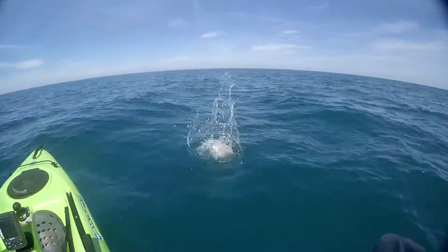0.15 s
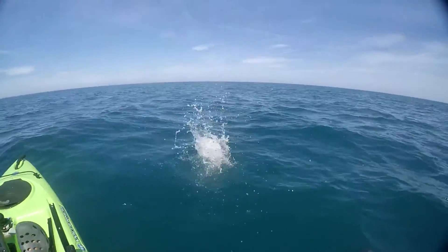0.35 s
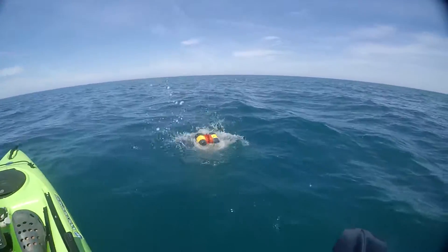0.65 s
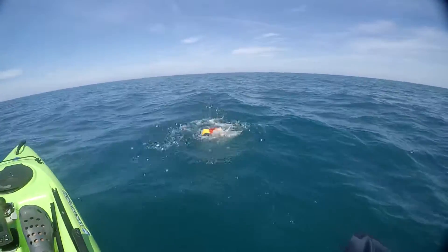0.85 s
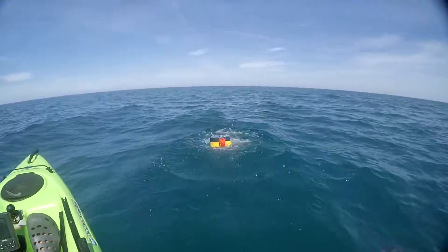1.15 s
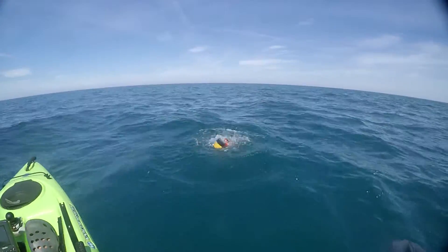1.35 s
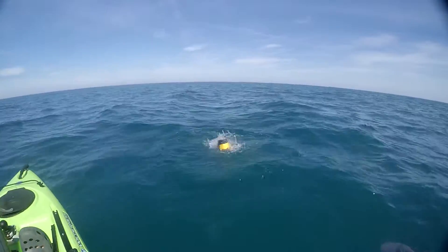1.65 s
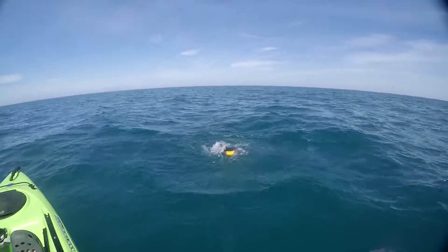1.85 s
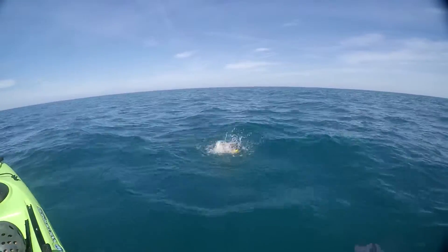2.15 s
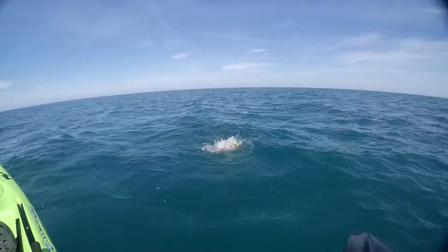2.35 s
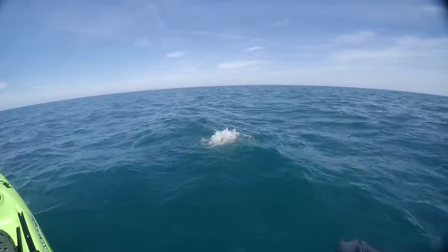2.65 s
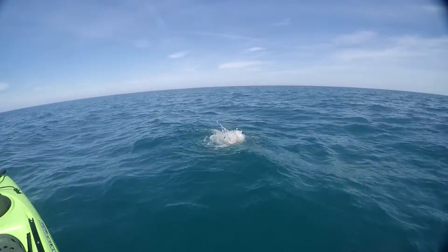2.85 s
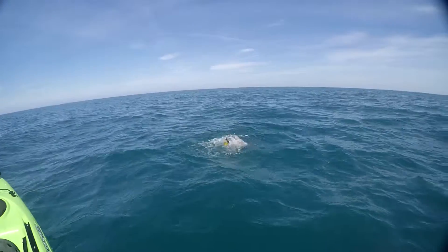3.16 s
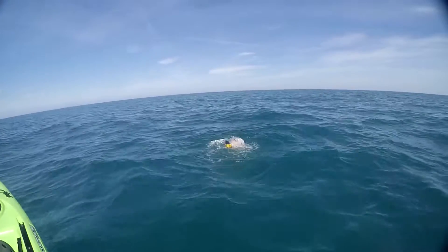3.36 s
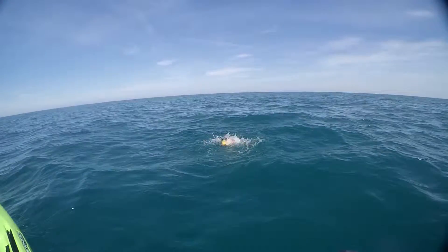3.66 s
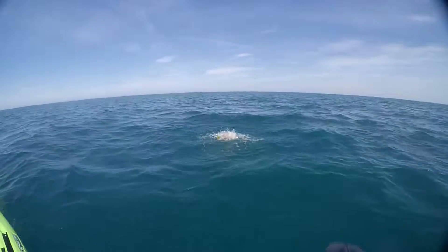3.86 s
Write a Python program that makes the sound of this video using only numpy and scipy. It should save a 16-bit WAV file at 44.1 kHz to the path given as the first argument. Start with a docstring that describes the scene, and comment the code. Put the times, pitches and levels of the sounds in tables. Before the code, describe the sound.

Something splashes into open water, followed by falling drops, soft gurgles and wind rumble.

```python
"""An object splashes into the sea a few metres from a kayak: a plume hisses, the cavity slaps shut,
the thrown water rains back and stray drops tick. Wavelets then lap, glug and fizz with ringing bubbles
and bump the hull. Wind sways and buffets the microphone, whose waterproof case gives the water
a hollow colour."""
import sys
import numpy as np
from scipy import signal
from scipy.fft import rfft, irfft
from scipy.io import wavfile
from scipy.ndimage import uniform_filter1d

SR = 44100
rng = np.random.default_rng(int(sys.argv[2]) if len(sys.argv) > 2 else 0)


def persist_wave(psi):
    """Save psi, clipped to +-1, as 16-bit WAV."""
    counts = np.round(np.clip(psi, -1, 1) * 32767).astype(np.int16)
    wavfile.write(sys.argv[1], SR, np.atleast_2d(counts).T)


N = 176400
T = np.arange(N) / SR

# Ringing of the waterproof case. Each row, as in every *_colour table: frequency in Hz, gain in dB.
CASE_COLOUR = [(300, 16.5), (900, 15.5), (1400, 5.5), (1750, -2.5), (2250, 7), (2850, -8.5), (3600, 6.5),
               (4300, 3.5), (5400, -1.5), (6500, -7), (7500, -2.5), (9000, -10), (15000, -3)]


def splash():
    """A plume hisses upward, the cavity slaps shut in a dense crackle, and thrown sheets of water land."""
    # Each row: peak time in s, level in dB, rise in s, fall in s.
    slap_swells = [(0.097, -43.5, 0.017, 0.0086), (0.111, -32.5, 0.0035, 0.0093),
                   (0.128, -30.5, 0.004, 0.0063)]
    plume_swells = [(0.006, -41.5, 0.0067, 0.0057), (0.05, -59.5, 0.059, 0.047), (0.14, -48, 0.076, 0.042),
                    (0.207, -49.5, 0.027, 0.039)]
    sheet_swells = [(0.498, -46.5, 0.019, 0.021), (0.542, -53.5, 0.022, 0.054)]
    slap_colour = [(200, -25), (450, -15), (700, -17), (1000, -5), (1450, -3), (1750, -5.5), (2150, 5.5),
                   (2900, -0.5), (3600, 6), (4500, -6), (5200, -5.5), (6200, -21), (7500, -16), (9000, -29),
                   (15000, -34)]
    plume_colour = [(240, -9), (400, -2), (838, -13), (913, 6), (980, -12), (1070, -4), (1360, -2.5),
                    (1780, -14), (2240, 1.5), (2930, -16), (3740, 2), (5730, -25.5), (7610, -18),
                    (8900, -26), (12000, -30), (15600, -56), (22000, -120)]
    sheet_colour = [(180, -41), (300, -21), (353, -11), (383, -22), (437, -12), (680, -17), (1350, -4),
                    (1700, -15), (2210, 3.5), (2730, -9), (2870, -17), (4770, -11.5), (15000, -36)]
    slaps = colour(patter(per_s=7000, spread_db=1), slap_colour) * swells(slap_swells)
    plume = colour(patter(per_s=5700, spread_db=3.5), plume_colour) * swells(plume_swells)
    sheets = colour(patter(per_s=4900, spread_db=3), sheet_colour) * swells(sheet_swells)
    return slaps + plume + sheets


def spray():
    """Fine droplets rain down, then thin out to the patter of the churned water."""
    # Each row: time in s, relative level in dB.
    levels = [(0, -60.5), (0.17, -61), (0.3, -59.5), (0.45, -63), (0.64, -57), (0.76, -64.5), (0.95, -65),
              (1.1, -74), (1.5, -70), (1.9, -71.5), (2.25, -69.5), (2.55, -72.5), (2.8, -72.5), (3.4, -73),
              (3.7, -72), (4.0, -71)]
    spray_colour = [(940, -61), (1600, -16.5), (1770, -10.5), (2030, 1.5), (2260, -5), (2910, -8),
                    (3530, 2.5), (3980, 0), (5710, -11), (6760, -31), (7360, -10), (8420, -30),
                    (12000, -26), (15600, -53), (22000, -120)]
    level_db = curve(levels) - 3.5 + 1.5 * walk(per_s=45)
    return colour(patter(per_s=2500, spread_db=4), spray_colour) * undb(level_db)


def drops():
    """Single drops land close by, each a short cluster of impacts ringing the case."""
    # Each row: start in s, level in dB, pitch in Hz, decay in s.
    landings = [(0.622, -54, 4130, 0.0069), (0.646, -48.5, 3880, 0.003), (0.667, -54, 4400, 0.004),
                (0.684, -51, 3400, .004), (0.735, -57, 4200, 0.0054), (0.824, -48, 1770, 0.0049),
                (0.834, -44, 3870, 0.0037), (0.879, -43, 4900, 0.0023), (0.947, -56, 4300, 0.0026),
                (0.993, -58, 1860, 0.02), (1.169, -57.5, 3780, 0.0052), (1.263, -43.5, 3950, 0.0036),
                (1.345, -59, 3000, 0.0045), (1.39, -51.5, 3990, 0.0028), (1.589, -61, 3630, 0.0024),
                (1.756, -60, 3600, 0.004), (1.993, -54, 3900, 0.0028), (2.097, -55, 4160, 0.003),
                (2.319, -57, 3610, 0.0036), (2.999, -61.5, 2200, 0.0027), (3.033, -57, 4310, 0.0023),
                (3.339, -60.5, 5200, 0.003), (3.485, -60, 4400, 0.0025), (3.585, -56, 3380, 0.003),
                (3.687, -47, 3540, 0.0032), (3.72, -55, 2600, 0.0035)]
    impacts = colour(patter(per_s=14000, spread_db=-8.5), CASE_COLOUR)
    return sum(burst(impacts, start_s, db, hz, decay_s, half_width_oct=0.64)
               for start_s, db, hz, decay_s in landings)


def glugs():
    """Air pockets close with a small slosh and ring briefly, rising in pitch."""
    # Each row: peak time in s, level in dB, starting pitch in Hz.
    pockets = [(0.057, -42, 1187), (0.932, -57, 1210), (1.075, -54, 1470), (1.346, -54, 1282),
               (1.358, -53.5, 1390), (1.541, -51.5, 1335), (1.695, -52.5, 1150), (1.73, -53.5, 1305),
               (1.757, -58, 980), (1.869, -58, 800), (2.029, -57, 1346), (2.04, -54, 930),
               (2.162, -60, 550), (2.219, -52, 1294), (2.243, -54, 1305), (2.36, -58, 1320),
               (2.487, -56, 816), (2.621, -52, 814), (2.722, -57, 790), (2.771, -54, 1274),
               (2.907, -54.5, 650), (2.923, -51.5, 1315), (2.938, -53, 950), (3.063, -57, 860),
               (3.119, -51, 1253), (3.2, -54, 1013), (3.21, -50, 1195), (3.267, -54.5, 1070),
               (3.282, -61, 1355), (3.31, -50.5, 1206), (3.404, -56, 830), (3.42, -55.5, 686),
               (3.613, -57, 750), (3.709, -55, 1340), (3.949, -55.5, 1220), (3.978, -54, 734)]
    attack_s, decay_s, glide_per_s = 0.004, 0.007, 4.94
    out, wash = 0, noise(CASE_COLOUR)
    for peak_s, db, hz in pockets:
        age_s = np.clip(T - peak_s + attack_s, 0, 0.2)
        phase = 2 * np.pi * hz * age_s * (1 + glide_per_s * age_s / 2)
        ring = undb(db) * np.sin(phase) * np.exp(-age_s / decay_s)
        slosh = burst(wash, peak_s, db - 6, hz, decay_s, half_width_oct=0.97)
        out += (ring + slosh) * (1 - np.exp(-age_s / attack_s))
    return out


def lapping():
    """Small bubbles ring and glide upward over the wash of the wavelets."""
    # Each row: time in s, relative level in dB.
    levels = [(0, -63), (0.4, -69.5), (0.7, -67.5), (0.8, -72.5), (1.2, -76.5), (1.4, -76), (1.5, -74),
              (1.75, -72.5), (2.0, -71.5), (2.25, -73), (2.55, -73.5), (2.8, -74.5), (2.95, -73),
              (3.25, -69.5), (3.45, -75), (3.7, -73.5), (3.9, -75.5), (4.0, -72.5)]
    lap_colour = [(200, -29), (350, -10), (600, -5.5), (820, 3.5), (1050, -3), (1350, 6), (1520, -1.5),
                  (1680, -10.5), (1900, -14.5), (2080, -4), (2300, 3), (2800, -16.5), (3600, -31)]
    bubbles_per_s, low_hz, high_hz, mean_cycles, glide = 420, 442, 2520, 13.3, 0.11
    bubbles = np.zeros(N + SR)
    for when, pitch, faintness, length in rng.random((int(bubbles_per_s * N / SR), 4)):
        hz = low_hz * (high_hz / low_hz) ** pitch
        life_s = mean_cycles * (0.5 + length) / hz
        progress = np.arange(int(life_s * SR)) / (life_s * SR)
        phase = 2 * np.pi * hz * life_s * progress * (1 + glide * progress / 2)
        gain = undb(-0.5 * np.log(max(faintness, 0.01))) * np.sqrt(hz)
        start = int(when * N)
        bubbles[start:start + len(phase)] += gain * undb(-40 * progress) * np.sin(phase)
    water = colour(bubbles[:N], lap_colour) + undb(-2) * noise(lap_colour)
    return unit(water) * undb(curve(levels) + 2.5 + 2 * walk(per_s=18))


def sloshes():
    """Small crests spill over in a soft rush of droplets."""
    # Each row: peak time in s, level in dB.
    crests = [(1.407, -59.5), (1.589, -60.5), (1.786, -62), (1.954, -63), (2.099, -63.5), (2.21, -62.5),
              (2.245, -59), (2.38, -65), (3.031, -65), (3.27, -66.5), (3.31, -66.5), (3.594, -61),
              (3.725, -62.5)]
    slosh_colour = [(200, -10.5), (700, -1.5), (1400, -1), (1750, -13), (2250, 3.5), (2850, -9.5),
                    (3500, 4.5), (4300, 0.5), (5400, -11), (6400, -17.5), (7500, -10), (8700, -29),
                    (10000, -16), (15000, -31)]
    rise_s, fall_s = 0.018, 0.0091
    envelope = swells([(peak_s, db, rise_s, fall_s) for peak_s, db in crests])
    return colour(patter(per_s=4000, spread_db=2), slosh_colour) * envelope


def hull():
    """Wavelets slap the kayak, and the hull answers with one or two dull swings."""
    # Each row: start in s, level in dB, pitch in Hz.
    bumps = [(0.991, -53, 90), (1.385, -54, 85), (2.152, -45, 104), (2.541, -48, 86), (2.717, -48, 100),
             (2.85, -49, 90), (3.283, -48.5, 110), (3.386, -50, 86), (3.459, -55, 80), (3.554, -46, 86),
             (3.752, -54, 95), (3.974, -50.5, 128)]
    slap_colour = [(60, -11), (150, 12), (280, -3), (450, -6), (800, -26), (2000, -40)]
    rise_s, decay_s = 0.0022, 0.013
    out, slap = 0, undb(-12) * noise(slap_colour)
    for start_s, db, hz in bumps:
        age_s = np.clip(T - start_s, 0, 0.3)
        envelope = (1 - np.exp(-age_s / rise_s)) * np.exp(-age_s / decay_s)
        out += undb(db) * (np.sin(2 * np.pi * hz * age_s) + slap) * envelope
    return out


def buffets():
    """Eddies thud on the microphone as rounded pressure pulses; the pushes carry a little turbulence."""
    # Each row: peak time in s, level in dB, half width in s, signed gain (push +, suction -).
    eddies = [(0.0969, -22, 0.0028, -0.81), (0.1087, -24, .0017, -1.18), (0.1239, -26, 0.0014, -0.76),
              (0.2777, -18.5, 0.0015, 0.94), (0.2909, -15.5, 0.0014, 0.92), (0.3015, -15, 0.0016, 0.92),
              (0.3085, -23.5, 0.0014, 1), (0.3164, -22.5, 0.00088, 0.97), (0.325, -26, 0.0014, 0.89),
              (0.503, -30, 0.003, 0.84), (0.8583, -25, 0.0021, 1), (0.868, -32.5, 0.0033, 1),
              (0.874, -39, 0.0012, 0.71)]
    thud_colour = [(5, 4), (40, 3.5), (80, 0.5), (125, 2), (190, 5.5), (260, -1), (450, 4), (1000, -1)]  # low boom of the thuds, near 190 Hz
    flutter_colour = [(100, 10.5), (400, -3.5), (1050, 0.5), (1600, -13.5), (4000, -46)]
    pulses = np.array([push * undb(db) / (1 + ((T - peak_s) / half_width_s) ** 2)
                       for peak_s, db, half_width_s, push in eddies])
    thuds = filtered(pulses.sum(axis=0), thud_colour)
    pushes = np.maximum(pulses, 0).sum(axis=0)
    return thuds + undb(-21) * pushes * noise(flutter_colour)


def wind():
    """Wind gives slow pressure swings, a gusty rumble and short puffs rustling on the case."""
    # Each row: time in s, level in dB.
    sway_levels = [(0, -32.5), (0.2, -19), (0.35, -12.5), (0.6, -29), (0.85, -27), (1.04, -19.5),
                   (1.4, -34), (1.9, -27.5), (2.15, -35), (2.45, -38.5), (3.0, -40), (4.0, -35.5)]
    rumble_levels = [(0, -40.5), (0.35, -43.5), (0.65, -52), (1.04, -48.5), (1.4, -49.5), (1.9, -52),
                     (2.3, -52), (2.5, -51), (2.65, -54), (2.85, -49), (3.18, -56.5), (3.45, -49.5),
                     (3.75, -52), (4.0, -51)]
    # Each row: peak time in s, level in dB, rise in s, fall in s.
    puff_swells = [(1.05, -61, 0.045, 0.044), (1.23, -61.5, 0.02, 0.043), (1.65, -66.5, 0.02, 0.084),
                   (1.92, -63.5, 0.03, 0.04), (2.05, -65, 0.038, 0.019), (2.42, -67, 0.013, 0.046),
                   (2.88, -64.5, 0.012, 0.035), (3.44, -68, 0.024, 0.025), (3.71, -61.5, 0.013, 0.024),
                   (3.86, -67, 0.015, 0.019)]
    sway_colour = [(2, -19), (5, 3), (10, 0), (20, -12.5), (30, -32), (50, -50), (100, -81), (300, -105)]
    rumble_colour = [(15, -29), (30, 5.5), (60, -8), (110, -20.5), (200, -26.5), (400, -34), (800, -48.5),
                     (2000, -65.5)]
    puff_colour = [(60, -10), (180, 3.5), (320, -0.5), (500, -4), (900, -15), (2000, -50)]
    rumble = noise(rumble_colour) * undb(curve(rumble_levels) + 2.05 * walk(per_s=14))
    sway = noise(sway_colour) * undb(curve(sway_levels))
    puffs = noise(puff_colour) * swells(puff_swells)
    edge_s = np.minimum(T, T[-1] - T)
    fade = np.sin(np.pi / 2 * np.minimum(edge_s / 0.03, 1))
    return fade * (sway + rumble) + puffs


def foam():
    """A fine high fizz flickers in level over a faint even hiss."""
    fizz_colour = [(2800, -9), (3400, -1), (4400, 10.5), (4900, -26), (6300, -14), (7400, 1.5),
                   (8500, -11.5), (10000, 1), (11500, -13), (14000, -18), (16000, -24)]
    hiss_colour = [(300, 2), (1300, -2), (1750, -18), (2300, 0.5), (2900, 2.5), (4000, 1), (6200, 0),
                   (7400, -4), (8600, -2.5), (10000, -4), (12000, -2), (15000, -7)]
    fizz = colour(patter(per_s=570, spread_db=2.5), fizz_colour)
    flicker_db = 3.5 * walk(per_s=25.04)
    return fizz * undb(-79 + flicker_db) + undb(-75.5) * noise(hiss_colour)


def undb(db):
    """Decibels to gain."""
    return 10 ** (np.asarray(db) / 20)


def unit(x):
    """Scale to rms 1."""
    return x / np.sqrt(np.mean(x ** 2))


def curve(rows):
    """Join (s, value) rows by straight lines."""
    return np.interp(T, *np.array(rows).T)


def filtered(x, points):
    """Filter by (Hz, dB) points."""
    hz, db = np.array(points).T
    bins_hz = np.maximum(np.fft.rfftfreq(N, 1 / SR), 1)
    return irfft(rfft(x) * undb(np.interp(np.log(bins_hz), np.log(hz), db)), N)


def colour(x, points):
    """Filter by (Hz, dB) points and scale to rms 1."""
    return unit(filtered(x, points))


def noise(points):
    """Coloured noise of rms 1."""
    return colour(rng.standard_normal(N), points)


def walk(per_s):
    """Random steps, smoothed twice; rms 1."""
    hold = int(SR / per_s)
    steps = np.repeat(rng.standard_normal(N // hold + 1), hold)
    return unit(uniform_filter1d(uniform_filter1d(steps, hold), hold)[:N])


def patter(per_s, spread_db):
    """Random impacts; a positive spread makes a few louder, a negative one a few softer."""
    hits = rng.random(N) < per_s / SR
    signs = np.sign(rng.standard_normal(N))
    return hits * signs * undb(spread_db * np.minimum(rng.exponential(size=N), 5))


def swells(rows):
    """Envelope of exponential rises and falls, summed in power."""
    return np.sqrt(sum((undb(db) * np.exp(-np.maximum((peak_s - T) / rise_s, (T - peak_s) / fall_s))) ** 2
                       for peak_s, db, rise_s, fall_s in rows))


def burst(x, start_s, db, hz, decay_s, half_width_oct, rise_s=0.00099):
    """A short burst of x around one pitch."""
    age_s = np.maximum(T - start_s, 0)
    band = [(f, -10 * np.log10(1 + (np.log2(f / hz) / half_width_oct) ** 4))
            for f in np.geomspace(50, SR / 2, num=40)]
    envelope = (1 - np.exp(-age_s / rise_s)) * np.exp(-np.minimum(age_s / decay_s, 20))
    return undb(db) * colour(x, band) * envelope


def scene():
    """Water and wind in the open, with no echo; mono."""
    water = splash() + spray() + drops() + glugs() + lapping() + hull() + foam()
    return (water + wind() + buffets() + sloshes())[None]


def record(dry):
    """The camera cuts the top treble."""
    cutoff_hz = 15350
    return signal.sosfilt(signal.ellip(14, 0.1, 80, cutoff_hz, fs=SR, output="sos"), dry)


dry = scene()
out = record(dry)
persist_wave(out)
```